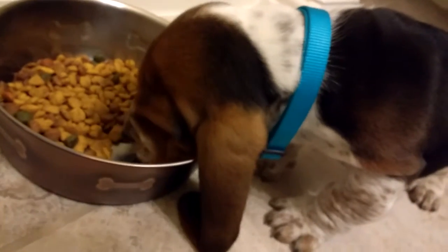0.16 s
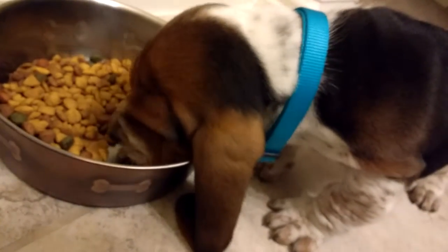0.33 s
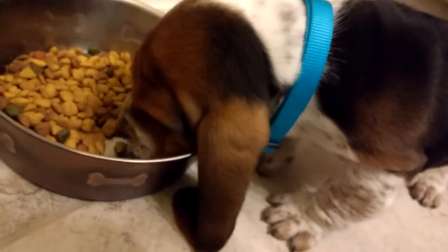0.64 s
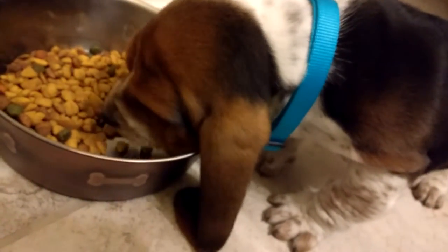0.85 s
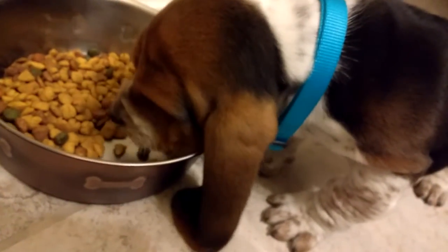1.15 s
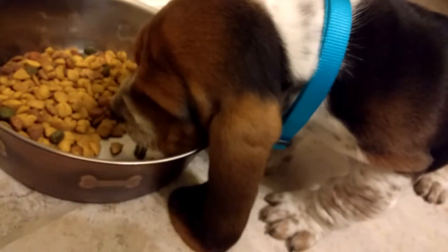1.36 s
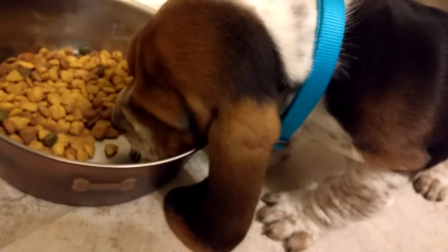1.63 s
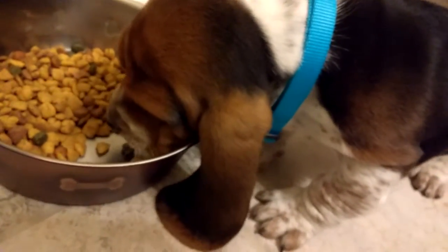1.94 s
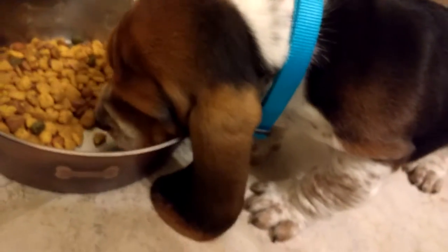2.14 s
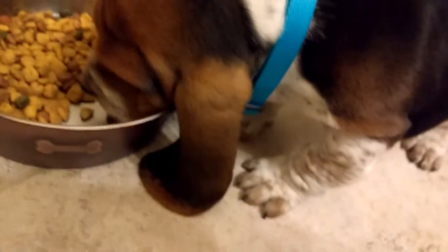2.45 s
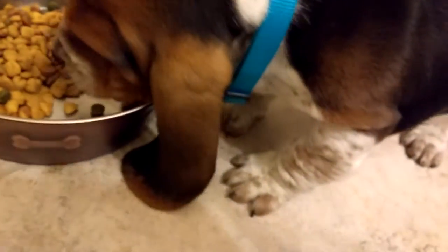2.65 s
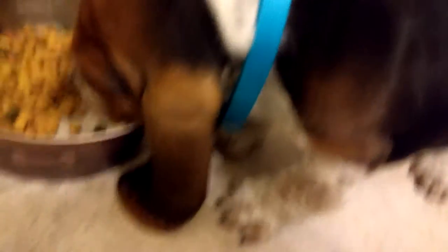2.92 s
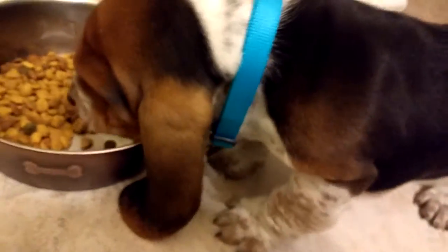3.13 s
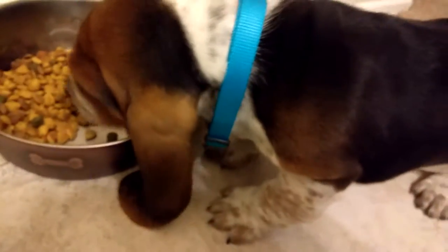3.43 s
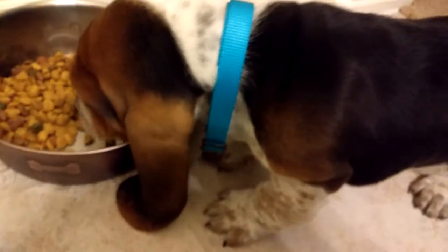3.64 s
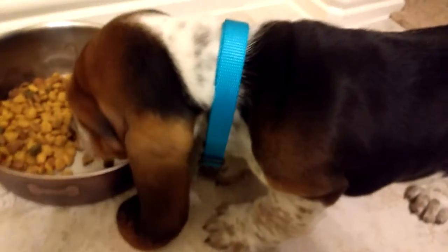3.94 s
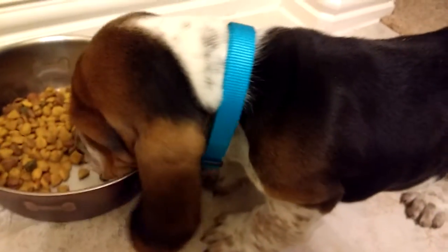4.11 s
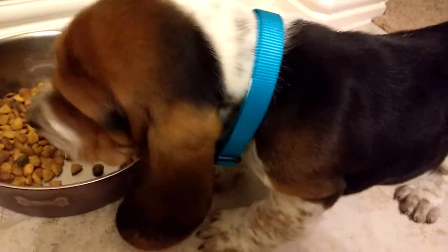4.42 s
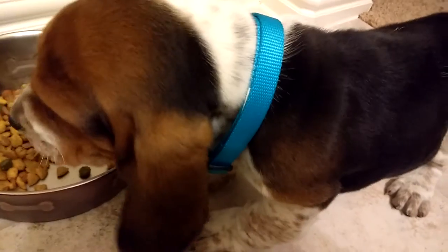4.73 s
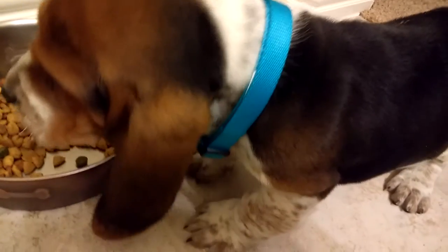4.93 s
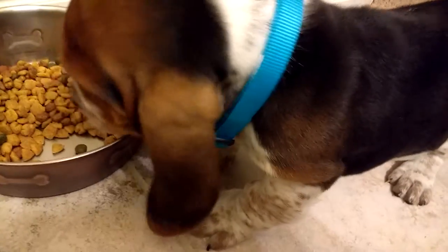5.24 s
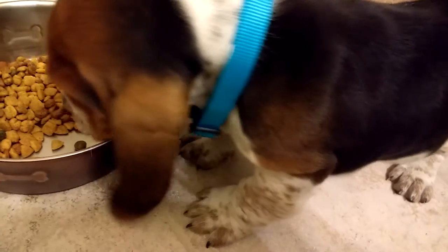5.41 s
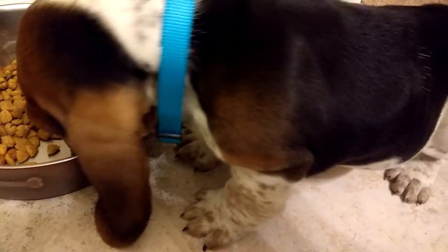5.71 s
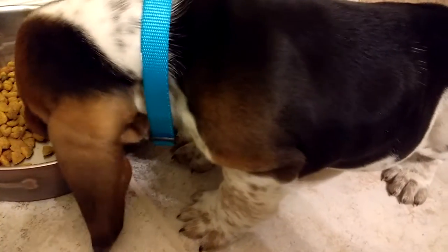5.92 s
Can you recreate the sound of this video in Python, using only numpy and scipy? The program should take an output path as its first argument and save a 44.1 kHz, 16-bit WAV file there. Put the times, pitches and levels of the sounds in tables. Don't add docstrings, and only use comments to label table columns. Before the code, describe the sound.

Close to a metal bowl, a dog bites dry kibble. Small ticks lead to hard, brittle crunches around one second and again, loudest, just after one and a half. Then the chewing eases into nosing: pieces rattle and tick on steel, the bowl bumps and drags on the hard floor, and thin nose whistles come and go. Quiet small room with a low hum-like rumble, short reflections, wide stereo.

```python
import sys
import numpy as np
from scipy import signal
from scipy.fft import rfft, irfft, next_fast_len
from scipy.io import wavfile

SR = 44100
rng = np.random.default_rng(int(sys.argv[2]) if len(sys.argv) > 2 else 0)


def voltage_ratio(level):
    return 10 ** (np.asarray(level, float) / 20)


def transcribe(signal):
    frames = np.atleast_2d(signal).T
    limited = np.clip(frames, -1, 1)
    pcm = np.round(limited * 32767).astype(np.int16)
    wavfile.write(sys.argv[1], SR, pcm)


N = 267687
BINS = next_fast_len(N + SR)
HZ = np.maximum(np.arange(BINS // 2 + 1) * SR / BINS, 1)
PORT_LAG_SAMPLES, BOWL_LAG_SAMPLES = 16.9, 11
PITCH_FOCUS_DB = 20


def in_time(rows):
    time_s, *columns = np.transpose(rows)
    return [np.interp(np.arange(N) / SR, time_s, column) for column in columns]


def rms_one(x):
    return x / np.sqrt(np.mean(x ** 2) + 1e-20)


def shaped(x, response):
    return irfft(rfft(x, BINS) * response, BINS)[..., :N]


def colour(points):
    hz, db = np.transpose(points)
    return voltage_ratio(np.interp(np.log(HZ), np.log(hz), db, left=-70))


def late(samples):
    return np.exp(-2j * np.pi * HZ * samples / SR)


def drift(rate_hz):
    knots = rng.standard_normal(200)
    return np.interp(np.arange(N) / SR * rate_hz, np.arange(200), knots) * 1.2


def ring(x, hz, width_hz):
    radius = np.exp(-np.pi * width_hz / SR)
    angle = 2 * np.pi * hz / SR
    return signal.lfilter([0, np.sin(angle)], [1, -2 * radius * np.cos(angle), radius * radius], x + 1e-18)


def band(x, low_hz, high_hz):
    return signal.sosfilt(signal.butter(2, [low_hz, high_hz], "band", fs=SR, output="sos"), x)


def add(out, start_s, burst):
    i = round(start_s * SR)
    out[:, i:i + burst.shape[1]] += burst[:, :N - i]


def grains(per_s, spread_db):
    born = rng.random((2, N)) < per_s * voltage_ratio(5 * drift(25)) / SR
    size = voltage_ratio(spread_db * np.minimum(rng.exponential(1, (2, N)), 4))
    return rms_one(born * size * rng.choice([-1, 1], (2, N)))


def breakage(decay_s, alike, count):
    noise = rng.standard_normal((3, count)) * voltage_ratio(2.87 * rng.standard_normal(count))
    lumps_db = np.append(6.0, rng.normal(0, 4.5, 39))
    lumps_db = np.repeat(lumps_db, 128)[:count]
    t = np.arange(count) / SR
    noise = noise * voltage_ratio(lumps_db - 60 * t / max(decay_s, .003)) * np.minimum(t / 0.00046, 1)
    alike = np.clip(alike, 0, 1)
    common = np.array([noise[0], np.roll(noise[0], BOWL_LAG_SAMPLES)])
    return alike * common + (1 - alike) * noise[1:]


def diffuse(noise):
    alike = .97 * np.sinc(2 * HZ * PORT_LAG_SAMPLES / SR)
    common, differing = shaped(noise, np.sqrt([1 + alike, 1 - alike]))
    return np.array([common + differing, common - differing]) / 2


# freq [Hz], density [dB per Hz]
ROOM_TONE = [(25, -7), (50, 0.5), (90, 8.5), (160, -5), (300, -13.5), (500, -24.5), (1000, -25),
             (2000, -27.5), (4000, -29), (6500, -28.5), (8500, -33.5), (11000, -34), (15500, -31)]


def room_tone():
    noise = diffuse(rng.standard_normal((2, N)))
    return voltage_ratio(-46) * rms_one(shaped(noise, colour(ROOM_TONE)))


# time_s [s], level_db [dB]
DRAG = [(0.0, -70), (0.12, -52), (0.29, -47), (0.8, -50.5), (0.9, -75), (1.37, -75), (1.62, -74),
        (1.71, -66), (2.65, -52), (2.8, -40.5), (3.09, -60), (3.62, -46.5), (4.82, -108), (5.75, -56),
        (5.99, -41.5), (6.07, -41)]


def drag():
    slips = ring(ring(grains(1500, spread_db=0.0)[0], 484, 31), 473, 165)
    return voltage_ratio(in_time(DRAG)[0] - 10.0) * rms_one(slips) * [[1.], [.7]]


# start_s [s], peak_db [dB], pitch_hz [Hz]
BUMPS = [(0.544, -46, 292), (0.806, -43, 221), (1.094, -43.5, 240), (1.231, -65, 313), (1.418, -45.5, 187),
         (1.606, -42, 360), (2.047, -50.5, 253), (2.549, -47, 194), (2.998, -44, 268), (3.455, -37.5, 279),
         (4.57, -47.5, 170), (5.324, -41, 294), (5.784, -53, 342), (6.023, -51, 277)]


def bumps():
    out, t = np.zeros((2, N)), np.arange(6000) / SR
    for start_s, peak_db, pitch_hz in BUMPS:
        knock = np.sin(2 * np.pi * pitch_hz * t * (1 - 3 * t))
        knock = knock * voltage_ratio(-60 * t / 0.047) * np.minimum(t / 0.0023, 1)
        knock = knock + 0.36 * np.roll(knock, 1300)
        add(out, start_s, voltage_ratio(peak_db + 15.5) * knock * [[1.], [.6]])
    return out


# start_s [s], length_s [s], level_db [dB]
WHISTLE = [(0.043, 0.11, -67), (1.433, 0.089, -62), (2.584, 0.24, -59.5), (3.043, 0.14, -56.5),
           (3.55, 0.051, -57.5), (4.06, 0.21, -57.5), (4.328, .22, -59.5), (4.82, 0.18, -64.5),
           (5.133, 0.07, -56), (5.334, 0.045, -55), (5.475, 0.12, -59), (5.666, 0.28, -60)]


def whistle():
    air = rms_one(ring(ring(rng.standard_normal((2, N)), 6580, 230), 6300, 290))
    breaths = np.zeros((1, N))
    for start_s, length_s, level_db in WHISTLE:
        swell = np.hanning(round(length_s * SR))[None] ** 0.35
        add(breaths, start_s, voltage_ratio(level_db) * swell)
    flutter_db = 2 * drift(20)
    return breaths * voltage_ratio(flutter_db) * air


# start_s [s], length_s [s], level_db [dB]
PUFFS = [(0.842, 0.04, -70), (1.979, 0.2, -64.5), (3.431, 0.033, -50), (3.46, 0.03, -57.5),
         (3.899, 0.055, -62.5), (4.466, 0.065, -71)]


def snorts():
    out = np.zeros((2, N))
    for start_s, length_s, level_db in PUFFS:
        count = round(length_s * SR)
        fall = np.hanning(2 * count)[count:] ** 0.25
        add(out, start_s, voltage_ratio(level_db) * rng.standard_normal((2, 9000))[:, :count] * fall)
    return shaped(out, colour([(3000, -13), (5500, 16.0), (8000, 13.5), (12000, 10), (15500, -14)]))


# freq [Hz], density [dB per Hz]
RUSTLE = [(300, -26.5), (500, 7), (900, -5.5), (1800, -2.5), (3500, -4.5), (5000, -15.5), (7000, -52)]


def rustle(dig_db):
    return voltage_ratio(dig_db + 4) * rms_one(shaped(grains(2500, spread_db=1.0), colour(RUSTLE)))


# freq [Hz], density [dB per Hz]
CRUMBS = [(3000, -14), (4500, -3), (6000, 0), (8500, -1), (10000, -5), (12000, -9), (15500, -13)]


def crumbs(dig_db):
    crumbs_db = -63.5 + 0.46 * (dig_db + 58.5)
    return voltage_ratio(crumbs_db + 5) * rms_one(shaped(grains(4000, spread_db=2.0), colour(CRUMBS)))


# mode_hz [Hz], width_hz [Hz], mode_db [dB]
BOWL = [(484, 73, -14), (580, 33, -7), (623, 15, -39), (845, 22, -1.5), (865, 25, 10), (1004.6, 14.3, -0.5),
        (1110, 130, 9), (1135.4, 6.4, -4), (1240, 73, 15.5), (1350, 310, -14), (1324, 270, 10),
        (1530, 130, -1)]


def rattle(push_db, spot_hz):
    taps = grains(900, spread_db=3.5)
    dealt = rng.integers(0, len(BOWL), (2, N))
    out, weight = 0, 0
    for k, (mode_hz, width_hz, mode_db) in enumerate(BOWL):
        gain = voltage_ratio(mode_db - PITCH_FOCUS_DB * np.log2(mode_hz / spot_hz) ** 2)
        out = out + ring(gain * taps * (dealt == k), mode_hz, 2.0 * width_hz)
        weight = weight + gain ** 2
    return voltage_ratio(push_db - 6.5) * rms_one(out / np.sqrt(weight))


# start_s [s], peak_db [dB], centre_hz [Hz], sharp_db [dB]
SNAPS = [(0.067, -29, 6100, -8), (0.1073, -28, 6400, -15), (0.2648, -25, 5450, -16), (0.3236, -30, 3580, 3),
         (0.3574, -30, 3300, -9), (0.3733, -26, 2640, -3), (1.273, -21, 2800, 4),
         (1.6494, -8.5, 2870, -6.5), (1.6986, -13, 2170, -2), (1.7439, -16, 3150, 4),
         (2.179, -32, 3940, -2), (4.156, -31, 3220, -6), (2.8792, -26.5, 6760, -14),
         (3.1292, -28, 2120, -15), (3.3447, -30.5, 6540, -4), (3.4437, -45, 8040, -8),
         (3.915, -38, 5530, -2), (4.0177, -26, 5300, -2), (4.028, -26, 5870, 1), (4.1763, -27, 3420, 9),
         (4.3325, -31, 3160, 3), (4.4496, -32, 3200, -8), (5.0924, -27.5, 5300, 6), (5.177, -28, 3880, 8),
         (5.4137, -24, 2730, -1), (5.4383, -30.5, 6500, -4), (5.4478, -27, 2780, 7),
         (5.534, -30.5, 3160, -3), (4.487, -29, 11000, -10), (5.9162, -21, 2060, -7)]


def snaps():
    shell_hz, shell_lead_s = 2450, 0.001517
    body, edge, fizz = np.zeros((3, 2, N))
    shells = [(row[0] - shell_lead_s, row[1] + row[-1], shell_hz, 0) for row in CRACKS + SMALL_CRACKS]
    for start_s, peak_db, centre_hz, sharp_db in shells + SNAPS:
        octaves, strong_db = np.log2(centre_hz / shell_hz), peak_db + 24.5
        edge_db = sharp_db - 6.5 - 0.5 * octaves + 0.41 * strong_db
        fizz_db = sharp_db - 18.5 + 10 * octaves + 0.83 * strong_db
        decay_s = 0.017 + 0.00023 * (peak_db + 33)
        drive = breakage(decay_s, alike=.8, count=2000)
        burst = ring(drive, centre_hz, .5 * centre_hz)
        splinter = drive / np.abs(drive).max()
        add(body, start_s, voltage_ratio(peak_db - 5.5) * burst / np.abs(burst).max())
        add(edge, start_s, voltage_ratio(peak_db + edge_db + 3.0) * splinter)
        add(fizz, start_s, voltage_ratio(peak_db + fizz_db + 0.5) * splinter)
    return band(body, 910, 17500) + band(edge, 3650, 5680) + band(fizz, 7200, 13800)


# start_s [s], peak_db [dB], centre_hz [Hz], crumbling_s [s], snap_db [dB over crack]
CRACKS = [(0.443, -30, 1180, 0.047, 7.5), (0.457, -28, 1330, 0.037, 8.5), (0.547, -15, 1220, 0.032, -3.5),
          (0.888, -23.5, 1160, 0.039, -4), (0.92, -6.5, 1190, 0.039, -6), (0.952, -7, 1400, 0.067, -3),
          (1.196, -27.5, 1240, 0.12, -9), (1.233, -14.5, 1220, 0.035, -0.5),
          (1.58, -13.5, 1020, 0.051, -6.5), (1.606, -8, 1150, 0.035, -5), (1.637, -16.5, 1230, 0.25, -25),
          (1.69, -7, 1170, 0.055, -6), (1.728, -8.5, 900, 0.058, -8), (1.761, -20, 940, 0.033, -27),
          (2.011, -33, 865, 0.045, 8), (2.02, -25, 915, 0.055, 3), (2.237, -14, 900, 0.062, -28),
          (2.271, -15, 760, 0.043, 2.5), (3.09, -29.5, 1440, 0.026, 5.5), (3.121, -27.5, 1240, 0.086, 8.5),
          (3.761, -26, 895, 0.019, -20), (4.563, -24, 813, 0.03, -7), (5.174, -28.5, 800, 0.038, 7),
          (5.927, -29.5, 1430, 0.046, 8)]
# start_s [s], peak_db [dB], centre_hz [Hz], crumbling_s [s]
CRUMBLES = [(.563, -29.5, 1250, 0.037), (.592, -28.5, 1190, 0.054), (.968, -15.5, 1350, 0.029),
            (.982, -17, 1290, 0.13), (1.01, -34, 1350, 0.027), (1.033, -40, 1350, 0.033),
            (1.247, -24, 1150, 0.027), (1.258, -20, 1130, 0.044), (1.278, -21.5, 1210, 0.071),
            (2.045, -27, 1190, 0.13), (2.296, -20.5, 1010, 0.055), (3.14, -35, 1310, 0.071),
            (5.933, -28, 2140, 0.05), (5.958, -41, 1500, 0.036)]
# start_s [s], peak_db [dB], centre_hz [Hz], snap_db [dB
SMALL_CRACKS = [(0.481, -28.5, 1320, -15), (0.693, -36.5, 684, -15), (0.803, -36.5, 1220, 4),
                (0.837, -33.5, 1160, 5), (0.855, -29.5, 1150, 3), (1.06, -29, 1390, -9), (1.162, -34, 1230, 8),
                (1.33, -50, 1240, -35), (1.358, -38, 1230, -15), (1.523, -35.5, 1100, -4),
                (2.159, -32.5, 1220, -9), (2.413, -35.5, 920, 7), (2.67, -26.5, 1180, -17),
                (2.829, -34.5, 1270, -6.5), (2.922, -39.5, 1250, 20), (3.445, -29.5, 1450, -3),
                (3.529, -28.5, 1250, 0), (3.59, -39, 1180, -15), (3.637, -38, 646, -15), (3.654, -35, 832, -15),
                (3.682, -33, 830, -15), (3.919, -33.5, 1350, 9.5), (4.018, -29, 820, -19),
                (4.205, -36, 1250, 15.5), (4.469, -34, 1350, 7.5), (5.037, -33.5, 694, -6.5),
                (5.608, -30.5, 834, 1.5), (5.755, -35, 810, 7), (5.783, -37, 1230, -5), (6.036, -34.5, 600, -15)]


def cracks():
    small_crumbling_s = 0.049
    out, jaw = np.zeros((2, 2, N))
    small_cracks = [(start_s, peak_db, centre_hz, small_crumbling_s) for start_s, peak_db, centre_hz, _ in SMALL_CRACKS]
    for start_s, peak_db, centre_hz, crumbling_s in [row[:4] for row in CRACKS] + CRUMBLES + small_cracks:
        drive = breakage(crumbling_s, alike=0.59, count=5000)
        strength_db = rng.normal(0, 2.5, len(BOWL))
        body = 0.37 * ring(ring(drive, centre_hz, 420), centre_hz, 420)
        body = body + voltage_ratio(11.5) * ring(drive, 1840, 510)
        for (mode_hz, width_hz, mode_db), own_db in zip(BOWL, strength_db):
            near_db = -PITCH_FOCUS_DB * np.log2(mode_hz / centre_hz) ** 2
            body = body + voltage_ratio(mode_db + near_db + own_db) * ring(drive, mode_hz, 0.89 * width_hz + 6)
        add(out, start_s, voltage_ratio(peak_db - 3.5) * body / np.abs(body).max())
        thud = ring(drive, 250, 147)
        add(jaw, start_s, voltage_ratio(peak_db - 28.5) * thud / np.abs(thud).max())
    no_bass = signal.butter(3, 520, "high", fs=SR, output="sos")
    return jaw + signal.sosfilt(no_bass, out)


def room(x):
    t60_s, echo_db = .28, -11
    t = np.arange(SR // 2) / SR
    tail = rng.standard_normal((2, len(t))) * voltage_ratio(-60 * t / t60_s) * (t > .006)
    tail = np.array([tail[0], 0.25 * tail[0] + 2.18 * tail[1]])
    tail = signal.lfilter([1], [1, -.45], tail)
    return x + voltage_ratio(echo_db) * shaped(x, rfft(tail / np.sqrt(np.sum(tail[0] ** 2)), BINS))


# time_s [s], push_db on the steel [dB], dig_db among the pieces [dB]
STIR = [(0.0, -59, -61.5), (0.44, -49, -60.5), (0.73, -60, -65.5), (0.85, -47.5, -63), (1.3, -55, -68),
        (1.6, -58, -62.5), (1.71, -45, -64), (2.0, -56.5, -63), (2.17, -50.5, -57.5), (2.62, -52.5, -59),
        (2.94, -55.5, -58), (3.35, -55, -58), (3.69, -63, -51.5), (4.04, -54.5, -59.5), (4.5, -72, -64.5),
        (4.95, -69, -69.5), (5.7, -66, -60), (6.07, -64.5, -60)]


def scene():
    push_db, dig_db = in_time(STIR)
    spot_hz, = in_time(sorted((row[0], row[2]) for row in CRACKS + SMALL_CRACKS))
    nosing = rattle(push_db, spot_hz) + rustle(dig_db) + crumbs(dig_db)
    near = nosing + cracks() + snaps() + drag() + snorts()
    return room(near) + bumps() + whistle() + room_tone()


def band_limit(x):
    return signal.sosfilt(signal.butter(12, 16170, fs=SR, output="sos"), x)


def record(dry):
    cross_gain = 1.1
    passband = 1 / (1 + (HZ / 15500) ** 150) / (1 - 1j * 45 / HZ)
    left_bass = 1 + 0.27 / (1 + (HZ / 400) ** 2)
    ports = shaped(dry, np.array([passband * left_bass, passband]))
    shadow = (1 + 1j * HZ / 700) ** -.3
    shadow = shadow * (.35 + .65 / (1 + (HZ / 8600) ** 12)) * (1 - .12 / (1 + (HZ / 300) ** 2))
    sides = ports - shaped(ports[::-1], cross_gain * shadow * late(PORT_LAG_SAMPLES))
    sides[0] = shaped(sides[0], .45 + .55 / (1 + (HZ / 10400) ** 14))
    return band_limit(sides)


dry = scene()
out = record(dry)
transcribe(out)
```